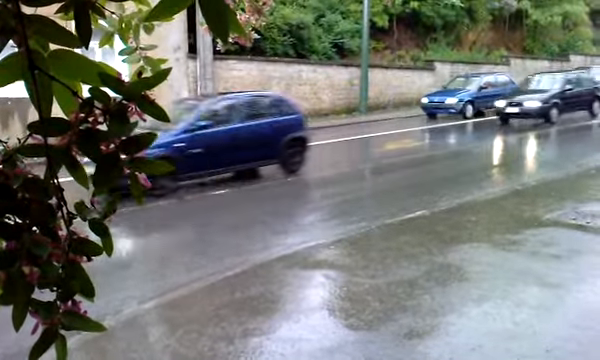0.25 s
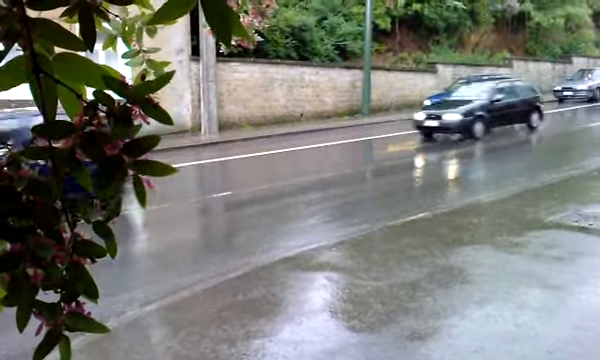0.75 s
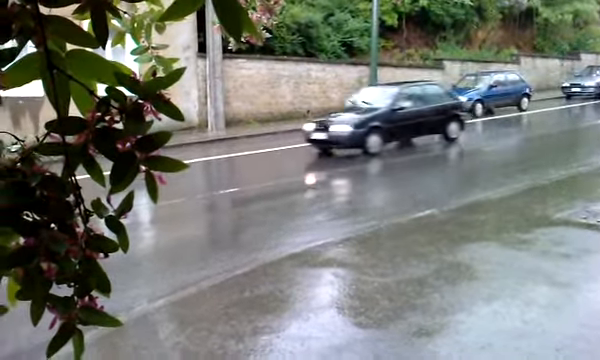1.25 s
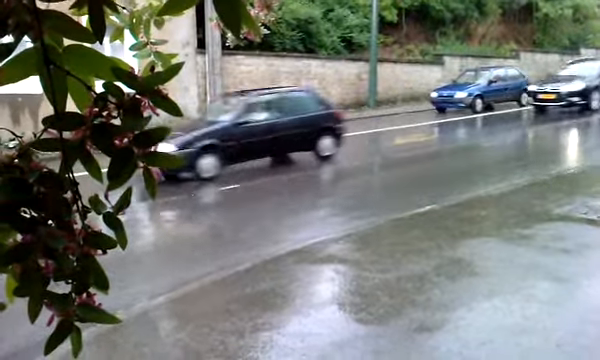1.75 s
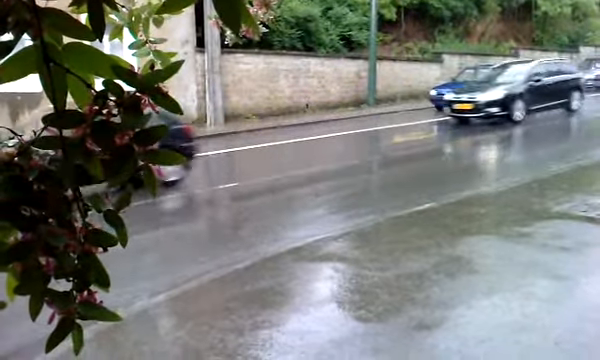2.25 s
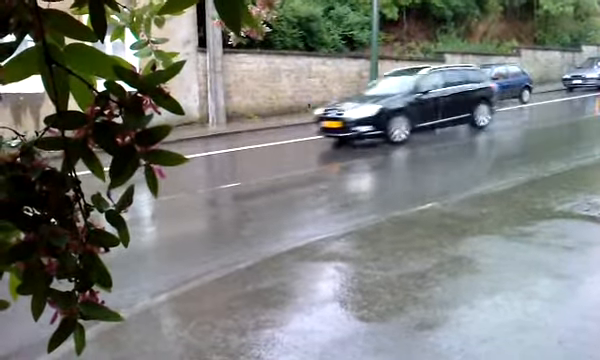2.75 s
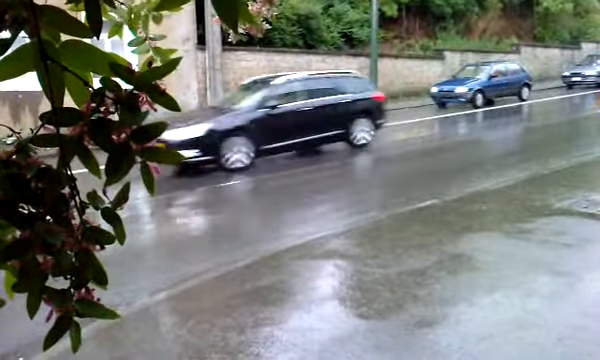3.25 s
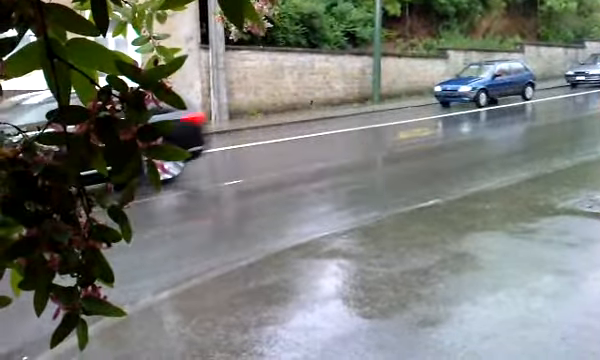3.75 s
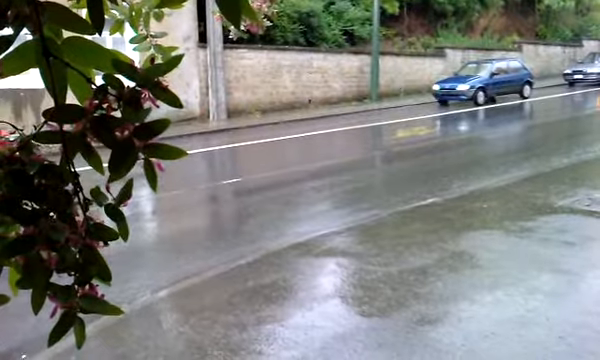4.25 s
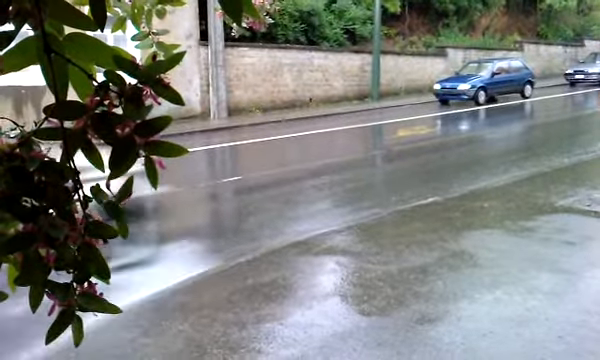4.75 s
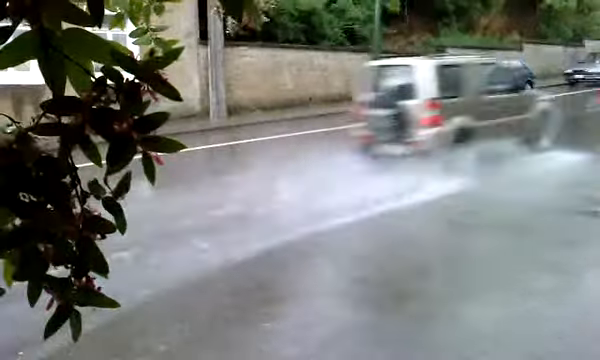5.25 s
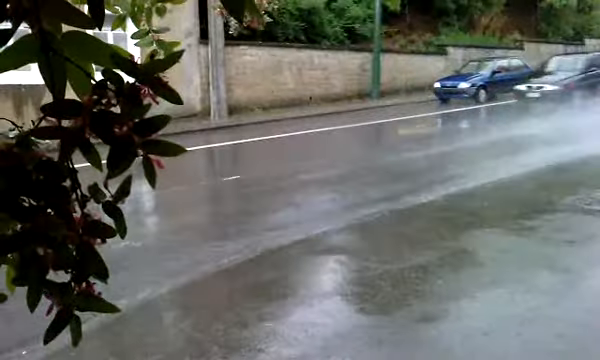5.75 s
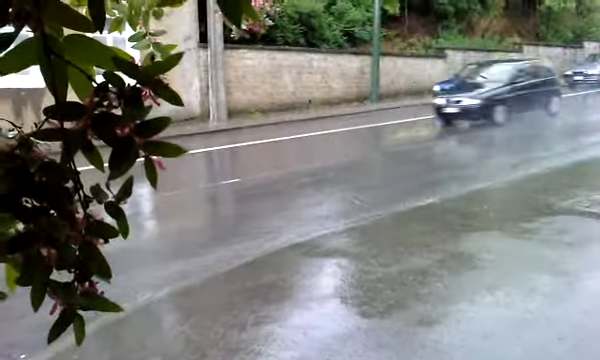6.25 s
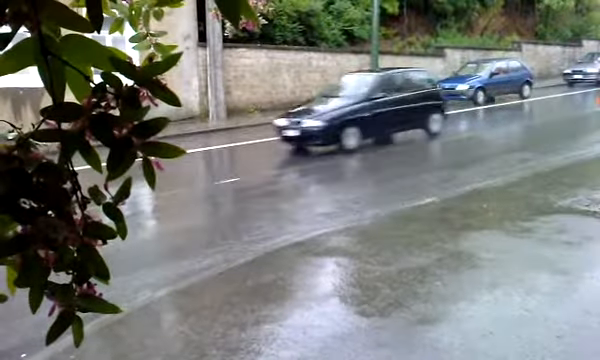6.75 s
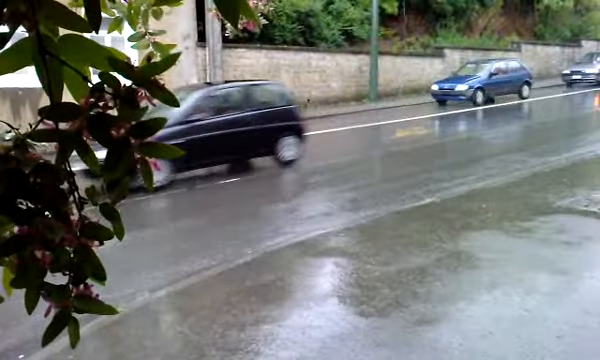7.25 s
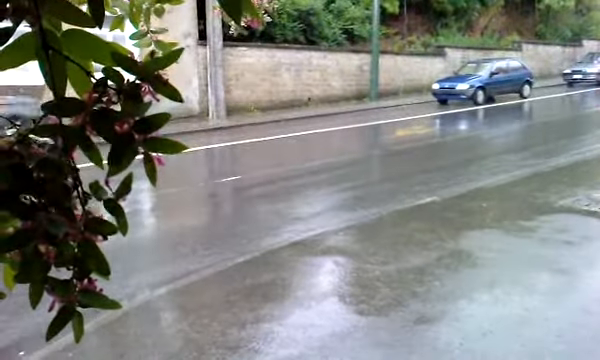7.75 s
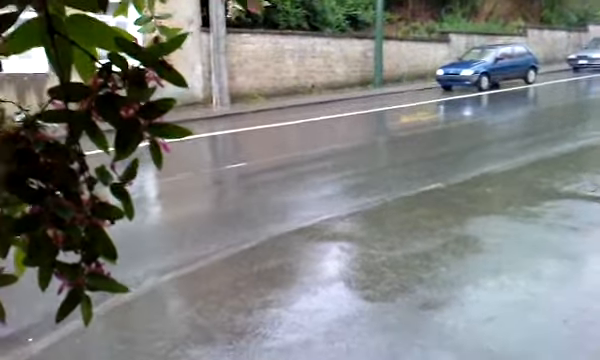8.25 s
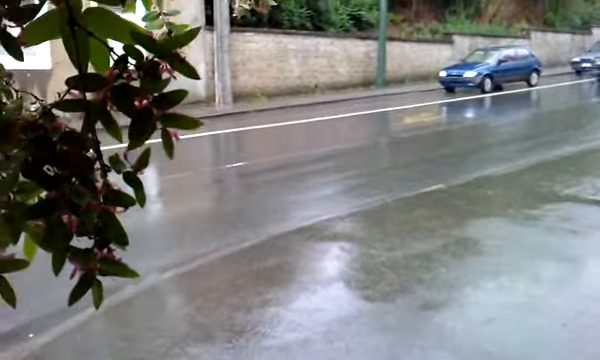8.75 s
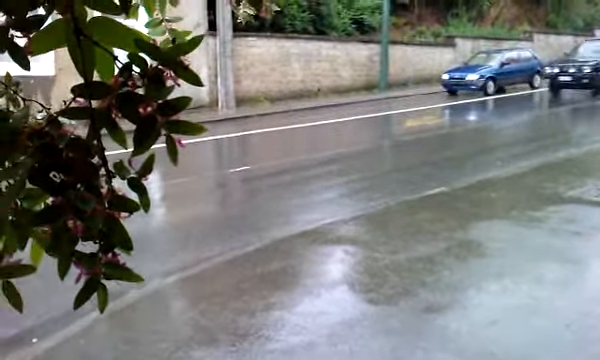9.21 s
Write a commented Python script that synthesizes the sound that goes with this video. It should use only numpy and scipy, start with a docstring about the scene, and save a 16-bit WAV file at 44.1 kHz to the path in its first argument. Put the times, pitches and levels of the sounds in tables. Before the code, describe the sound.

Steady rain patters on a street while fat drops tick sharply on leaves beside the microphone. Wet tyres swell and fade from the start, the third pass loudest at about two and a half seconds, with a fuller roar. A lull midway exposes a faint idling engine. More cars then hiss past, one strong and splashing near nine seconds, and another approaches at the end.

```python
"""Rain patters over a steady wash on a street, with fat drops ticking on leaves close by.
Cars pass through the water from the start, the third loudest: tyres hiss and roar as narrow bands glide.
Halfway comes a lull, where the hum of an idling engine and low drones come through.
Then more cars swell and fade, bursting through puddles, and another draws near at the end.
Sources are coloured noise, sparse impacts and engine harmonics; the deep bass flickers and high peaks clip."""
import sys
import numpy as np
from scipy import signal
from scipy.fft import rfft, irfft
from scipy.io import wavfile
from scipy.ndimage import uniform_filter1d

SR = 44100
rng = np.random.default_rng(int(sys.argv[2]) if len(sys.argv) > 2 else 0)


def generate_wav(sig):
    """Save sig (samples, or channels by samples) to the path in sys.argv[1] as 16-bit PCM at SR."""
    pcm = np.round(np.clip(np.atleast_2d(sig).T, -1, 1) * 32767).astype(np.int16)
    wavfile.write(sys.argv[1], SR, pcm)


N = 418068

# time-frequency grid on which noise is shaped (samples)
FRAME, HOP = 1024, 256
HZ = np.fft.rfftfreq(FRAME, 1 / SR)
FRAME_S = np.arange(N // HOP + 5)[:, None] * HOP / SR


def amp(db):
    """Decibels to gain."""
    return 10 ** (np.asarray(db) / 20)


def evened(x):
    """Scales to rms 1."""
    return x / np.sqrt(np.mean(x ** 2) + 1e-20)


def colour(points, hz):
    """Gain of a spectrum, joined on a log-frequency axis."""
    point_hz, db = np.transpose(points)
    return amp(np.interp(np.log(hz + 1), np.log(point_hz), db))


# The microphone's colour, with its port resonance. Each row: frequency in Hz, gain in dB.
MIC_COLOUR = [(2500, 0.5), (3400, 1.5), (4150, 3.5), (4500, 1.5), (5000, -4), (5900, -3.5), (7000, -6.5),
              (8600, -6.5), (9400, -11.5), (10200, -30.5), (11000, -75), (12500, -66)]


def heard(points):
    """A source's spectrum through the microphone, at unit power."""
    return evened(colour(points, HZ) * colour(MIC_COLOUR, HZ))


def patches(size):
    """Smooth chance over time and frequency, at rms 1; size is (frames, bins)."""
    field = rng.standard_normal((len(FRAME_S), len(HZ)))
    field = uniform_filter1d(field, size[0], axis=0)
    return evened(uniform_filter1d(field, size[1], axis=1, mode="wrap"))


def splashes(per_s, spread_db):
    """Random impacts of either sign, most of them small and a few large."""
    size = amp(spread_db * np.minimum(rng.exponential(1, N), 3.6))
    sign = rng.choice([-1, 1], N)
    struck = rng.random(N) < per_s / SR
    return evened(size * sign * struck)


def shaped(gains, grain=None, share=0):
    """Noise, with a share of its power as separate impacts, under gains moving in time and frequency."""
    drive = rng.standard_normal(N)
    if grain is not None:
        share = np.clip(share, 0, 1)
        drive = np.sqrt(1 - share) * drive + np.sqrt(share) * grain
    spectrum = signal.stft(drive, nperseg=FRAME, noverlap=FRAME - HOP)[2]
    spectrum = spectrum * gains[:spectrum.shape[1]].T
    return signal.istft(spectrum, nperseg=FRAME, noverlap=FRAME - HOP)[1][:N]


def swells(rows):
    """Narrow bands of noise that swell, glide and fade."""
    power = 0
    for peak_s, length_s, hz, glide, width_hz, db in rows:
        age_s = np.clip(FRAME_S - peak_s, -length_s / 2, length_s / 2)
        band = np.exp(-2 * ((HZ - hz * 2 ** (glide * age_s)) / width_hz) ** 2)
        swell = abs(np.cos(np.pi * age_s / length_s))
        power = power + amp(db) ** 2 * swell * band / band.mean(1, keepdims=True)
    return shaped(np.sqrt(power))


def distance(abreast_s, reach_s):
    """A car's distance on a straight road, as a multiple of its closest."""
    return np.hypot(1, (FRAME_S - abreast_s) / reach_s)


# ripple from the road's reflection: spacing with the car abreast (Hz), strength at the low end (0-1)
ECHO_SPACING_HZ, ECHO_SHARE = 800, 0.033


def road_echo(far):
    """The wet road mirrors tyre noise; the ripples are closest in frequency when the car is nearest."""
    fading = np.exp(-(HZ / 3800) ** 2)  # weaker in the treble
    return 1 + ECHO_SHARE * fading * np.cos(2 * np.pi * HZ / (ECHO_SPACING_HZ * far))


# how the spray fades (dB per doubling of distance)
SPRAY_FALL_DB = 14
# spray is brighter as a car approaches and duller behind it (dB over the octave above the pivot)
APPROACH_TILT_DB = 2.5
# Colour of tyre spray. Each row: frequency in Hz, relative level in dB per Hz.
SPRAY_COLOUR = [(100, -47.5), (500, -21.5), (1000, -21), (2000, -6), (3000, 0), (4100, 1.5), (5700, -2),
                (8000, -10), (10000, -18.5)]
# Tyres burst through puddles. Each row: peak time in seconds, half length in seconds, level in dB.
PUDDLE_BURSTS = [(1.098, 0.071, -21), (1.878, 0.094, -20), (2.21, 0.029, -19.5), (2.407, .025, -20),
                 (2.626, .04, -21), (2.83, 0.056, -21.5), (6.964, 0.06, -32), (7.36, .1, -24.5),
                 (8.567, 0.029, -17.5), (8.91, 0.04, -21), (9.03, 0.011, -13.5), (9.22, 0.052, -18.5)]
# Passing cars. Each row: time abreast in seconds, seconds taken to drive as far as the lane is from
# the microphone, level abreast in dB of spray, of roar and of drum, fineness of the spray in dB per octave.
PASSING_CARS = [(0.15, 0.75, -20.5, -31.5, -43, 4), (1.2, 1.03, -19.5, -28.5, -37, 0.5),
                (2.58, 0.86, -15.5, -17, -29, 0), (3.83, 0.76, -22.5, -27.5, -55.5, -0.5),
                (6.35, 0.98, -26.5, -35, -59.5, -7), (7.65, 0.68, -19.5, -47, -41.5, 1.5),
                (8.89, 1.09, -15.5, -21, -35.5, -0.5), (10.4, 0.9, -22, -33.5, -46.5, 0.5)]


def spray(patchy_db=1.0, surge_db=0.21, pivot_hz=4200):
    """Tyres tear the water film into droplets, in small surges; finer droplets hiss higher."""
    treble = np.clip(np.log2((HZ + 1) / pivot_hz), 0, 1)
    power = 0
    for abreast_s, reach_s, spray_db, _, _, fine_db in PASSING_CARS:
        far = distance(abreast_s, reach_s)
        approach = (abreast_s - FRAME_S) / (reach_s * far)  # near 1 coming, near -1 going
        level_db = spray_db - SPRAY_FALL_DB * np.log2(far)
        tilt_db = (fine_db + APPROACH_TILT_DB * approach) * treble
        power = power + (amp(level_db + tilt_db) * road_echo(far)) ** 2
    for peak_s, half_s, db in PUDDLE_BURSTS:
        power = power + amp(db) ** 2 * np.exp(-((FRAME_S - peak_s) / half_s) ** 2)
    uneven = amp(patchy_db * patches(size=(10, 12)) + surge_db * patches(size=(8, 250)))
    gains = heard(SPRAY_COLOUR) * np.sqrt(power) * uneven
    return shaped(gains, splashes(per_s=4000, spread_db=3.0), share=0.19)


# how each part fades (dB per doubling of distance)
ROAR_FALL_DB, DRUM_FALL_DB, RUMBLE_FALL_DB = 14.5, 14, 23.5
# the body rumbles just ahead of the closest point, the casings drum just after it
RUMBLE_LEAD_S, DRUM_LAG_S = 0.19, 0.19
# Colours of tread roar, casing drum and body rumble.
# Each row: frequency in Hz, relative level in dB per Hz.
ROAR_COLOUR = [(150, -49.5), (600, -7.5), (1050, 1.5), (1600, 3), (2500, 2.5), (3500, -3.5), (5000, -10.5),
               (10000, -25)]
DRUM_COLOUR = [(100, -39), (420, -7), (550, -3), (780, 3), (950, 1), (1300, -25), (4000, -40)]
RUMBLE_COLOUR = [(50, -49.5), (100, -35), (190, -4.5), (290, 0), (400, 0.5), (600, -0.5), (1500, -24)]


def tyres(rumble_db=-7.5, patchy_db=1.65):
    """Tread roar and casing drum fade alike with distance; body rumble fades fastest."""
    power = 0
    for abreast_s, reach_s, _, roar_db, drum_db, _ in PASSING_CARS:
        far = distance(abreast_s, reach_s)
        drum_far = distance(abreast_s + DRUM_LAG_S, reach_s)
        rumble_far = distance(abreast_s - RUMBLE_LEAD_S, reach_s)
        roar = heard(ROAR_COLOUR) * amp(roar_db - ROAR_FALL_DB * np.log2(far))
        drum = heard(DRUM_COLOUR) * amp(drum_db - DRUM_FALL_DB * np.log2(drum_far))
        # the rumble's level is set relative to the drum
        rumble_level_db = drum_db + rumble_db - RUMBLE_FALL_DB * np.log2(rumble_far)
        rumble = heard(RUMBLE_COLOUR) * amp(rumble_level_db)
        power = power + (roar ** 2 + drum ** 2 + rumble ** 2) * road_echo(far) ** 2
    # uneven water depth makes the colour shift from moment to moment
    shifting = amp(patchy_db * patches(size=(14, 4)))
    return shaped(np.sqrt(power) * shifting)


# Each row: peak time in seconds, length in seconds, pitch in Hz, glide in octaves per second,
# width in Hz, level in dB.
GLIDING_BANDS = [(.5, 0.48, 890, 0.072, 110, -39), (1.27, .3, 2120, 0.023, 220, -29),
                 (1.9, 0.52, 810, -0.047, 260, -35), (2.22, 1.3, 1610, -0.22, 210, -27),
                 (2.32, 0.34, 2850, 0, 250, -26), (2.1, 1.1, 5300, 0.03, 350, -29),
                 (2.77, 0.39, 550, 0.055, 55, -32), (2.65, 0.6, 825, -0.05, 70, -28),
                 (2.7, 0.74, 716, 0, 55, -29.5), (2.58, 0.87, 4180, -0.1, 700, -20.5),
                 (3.28, 0.54, 1100, 0.15, 70, -28), (3.28, 1, 1430, 0.12, 250, -27),
                 (3.7, 0.41, 766, .2, 120, -35.5), (4.1, 0.56, 1110, 0.34, 129.6, -37),
                 (5.3, 1.7, 713, -0.18, 55, -44), (7.05, .4, 487, 0, 35, -48),
                 (7.74, 0.81, 487, -0.082, 42, -40), (8.15, 0.93, 1710, -0.29, 280, -29),
                 (8.25, .3, 1120, -.2, 80, -33), (8.62, 0.33, 797, -0.14, 52, -29),
                 (8.96, 0.35, 753, -.25, 45, -32)]


def gliding_bands():
    """Narrow bands of noise glide and swell as cars pass."""
    return swells(GLIDING_BANDS)


RAIN_DB = -26
# Colour of rain on the road. Each row: frequency in Hz, relative level in dB per Hz.
RAIN_COLOUR = [(60, -47.5), (130, -22), (200, -21.5), (270, -11), (360, -10.5), (425, -12.5), (520, -8.5),
               (740, -7), (1000, -8), (1600, -6.5), (2400, -5.5), (4100, 0.5), (6000, -1), (10000, -15)]


def rain():
    """Thousands of drops on the road merge into a wash with a fine patter on top."""
    gains = heard(RAIN_COLOUR) * amp(RAIN_DB + 0.51 * patches(size=(14, 14)))
    return shaped(gains, splashes(per_s=2500, spread_db=3.5), share=0.32)


# each leaf colours its tick differently: middle pitch (Hz), spread (octaves), height of the ring (dB)
LEAF_HZ, LEAF_SPREAD, LEAF_RING_DB = 3800, 0.53, 14
# Fat drops on the leaves close by. Each row: start in seconds, peak level in dB.
LEAF_DROPS = [(.0838, -20), (.2945, -15), (.4064, -17), (.4485, -15), (1.0988, -7), (2.1987, -4),
              (3.2026, -10), (3.3763, -6), (3.4006, -10), (3.858, -13), (3.8693, -10), (4.0332, -19),
              (4.5228, -21), (4.8966, -18), (4.9476, -16), (5.7914, -18), (6.2492, -17), (6.3201, -21),
              (6.524, -16), (7.1108, -15), (7.529, -13), (7.7372, -12), (7.9925, -8), (8.9164, -8)]


def near_drops(decay_s=0.0015):
    """Each drop slaps a different leaf with a short, dead tick."""
    out = np.zeros(N + FRAME)
    t = (np.arange(FRAME) - FRAME // 2) / SR
    for start_s, db in LEAF_DROPS:
        leaf_hz = LEAF_HZ * 2 ** (LEAF_SPREAD * rng.standard_normal())
        ring = amp(LEAF_RING_DB * np.exp(-(2 * np.log2((HZ + 1) / leaf_hz)) ** 2))
        slap = rng.standard_normal(FRAME) * (t >= 0) * np.exp(-abs(t) / decay_s)
        tick = irfft(rfft(slap) * ring * heard(SPRAY_COLOUR)) * np.hanning(FRAME)
        first = round(start_s * SR) - FRAME // 2
        out[first:][:FRAME] += amp(db) * tick / abs(tick).max()
    return out[:N]


# Each row: peak time in seconds, length in seconds, pitch in Hz, glide in octaves per second,
# width in Hz, level in dB.
LOW_DRONES = [(4.8, .6, 277, 0, 22, -49.5), (5.95, 1.4, 270, 0, 26, -50), (6.68, 0.2, 318, 0, 45, -47.5),
              (8.55, 0.67, 268, 0, 29, -47)]


def low_drones():
    """Low drones: narrow bands of noise that swell and fade."""
    return swells(LOW_DRONES)


# Each row: time in seconds, length in seconds, pitch in Hz, glide in octaves per second,
# width in Hz, level in dB.
LOW_BUMPS = [(3.5, 0.53, 140, 0, 90, -48.5), (9.1, 0.055, 130, 0, 110, -43),
             (9.27, 0.38, 150, 0, 80, -43.5)]


def bumps():
    """Soft low bumps, each a brief swell of bass noise."""
    return swells(LOW_BUMPS)


# an engine idles nearby: firing rate and level of its hum
FIRING_HZ, HUM_DB = 42.8, -54
# The engine's harmonics. Each row: multiple of the firing rate, relative level in dB.
ENGINE_HARMONICS = [(2, -1.5), (3, 3), (4, -5), (5, -7.5), (6, 2), (7, -2)]


def engine(waver=0.006, flutter=0.2):
    """Low firing harmonics whose speed and strength waver."""
    t = np.arange(N) / SR
    knots = np.linspace(0, N / SR, num=70)

    def drift():
        """A slow random wander."""
        return np.interp(t, knots, rng.standard_normal(len(knots)))

    turns = np.cumsum(FIRING_HZ * (1 + waver * drift())) / SR
    hum = 0
    for multiple, db in ENGINE_HARMONICS:
        strength = amp(db) * (1 + flutter * drift())
        hum = hum + strength * np.sin(2 * np.pi * (round(multiple) * turns + rng.random()))
    return amp(HUM_DB) * evened(hum)


BASS_DB = -55.5
# Colour of the street's bass. Each row: frequency in Hz, relative level in dB per Hz.
BASS_COLOUR = [(15, -8.5), (40, -7.5), (65, 0.5), (100, 0.5), (160, 5.5), (230, -6), (400, -31)]


def bass(lumpy_db=3.0):
    """Faint, deep, lumpy noise of the street."""
    return shaped(heard(BASS_COLOUR) * amp(BASS_DB + lumpy_db * patches(size=(8, 60))))


# top of the flickering band, and the depth of its gaps
FLICKER_HZ, FLICKER_GAP_DB = 171, -28
# The deep bass flickers, most of all while cars pass.
# Each row: time in seconds, share of the time that the bass is present from 0 to 1.
BASS_PRESENCE = [(0, 0.28), (1.75, 0.62), (1.9, 0.26), (3.05, .1), (3.3, 1), (3.9, 0.6), (4.3, 0.9),
                 (7.2, 0.94), (7.35, 0.33), (8.1, 0.6), (8.25, 0), (9, 0.22), (9.08, 0.77)]


def flicker(x, softness=0.1):
    """The deep bass drops away between brief, irregular surges."""
    chance = uniform_filter1d(uniform_filter1d(rng.standard_normal(len(FRAME_S)), size=7), size=5)
    chance = chance - uniform_filter1d(chance, size=24)  # keeps only quick changes
    rank = np.argsort(np.argsort(chance)) / len(chance)
    share = np.interp(FRAME_S[:, 0], *np.transpose(BASS_PRESENCE))
    present = np.clip(1 + (share - rank) / softness, 0, 1)
    gap = np.interp(np.arange(N) / SR, FRAME_S[:, 0], uniform_filter1d(1 - present, size=3))
    lowpass = signal.butter(N=5, Wn=FLICKER_HZ, fs=SR, output="sos")
    deep = signal.sosfiltfilt(lowpass, x)
    return x - deep * gap * (1 - amp(FLICKER_GAP_DB))


def scene():
    """Rain, traffic and close drops at one microphone."""
    traffic = spray() + tyres() + gliding_bands()
    background = low_drones() + engine() + bass() + bumps()
    return flicker(rain() + near_drops() + traffic + background)[None]


def record(dry, ceiling=0.72, edge_hz=15830):
    """The highest peaks clip; then a steep lowpass limits the band."""
    clipped = np.clip(dry, -ceiling, ceiling)
    lowpass = signal.firwin(511, edge_hz, window=("kaiser", 9), fs=SR)
    return signal.oaconvolve(clipped, lowpass[None], "same")


dry = scene()
out = record(dry)
generate_wav(out)
```